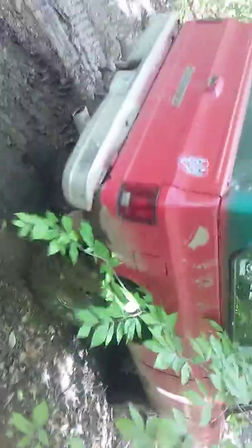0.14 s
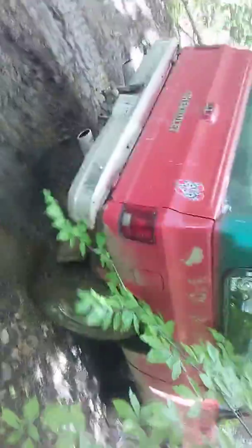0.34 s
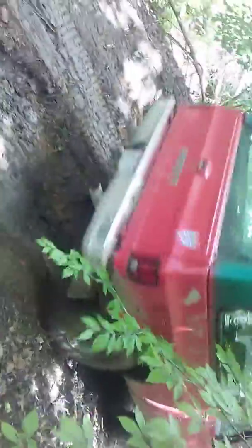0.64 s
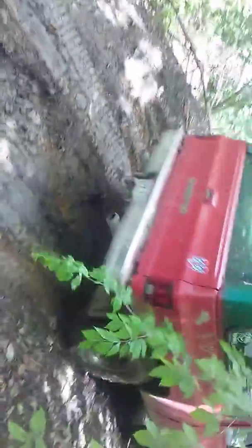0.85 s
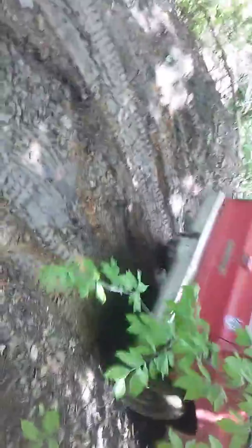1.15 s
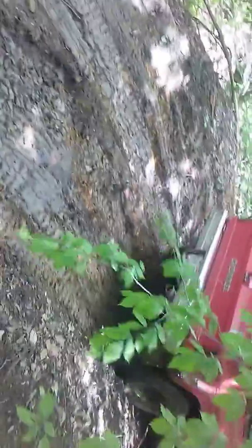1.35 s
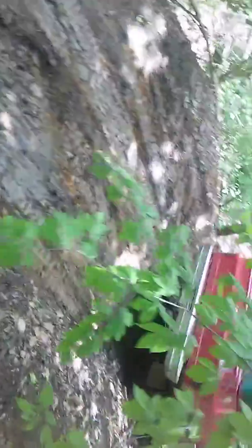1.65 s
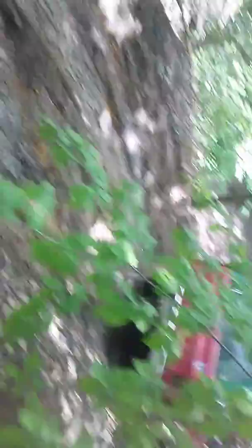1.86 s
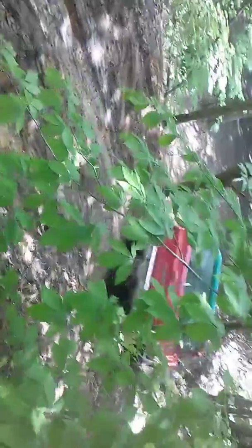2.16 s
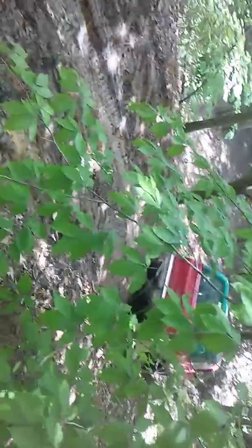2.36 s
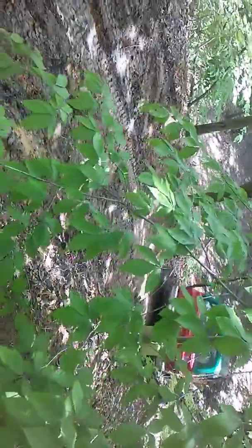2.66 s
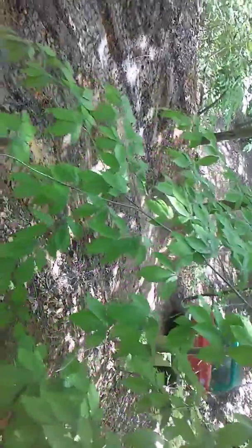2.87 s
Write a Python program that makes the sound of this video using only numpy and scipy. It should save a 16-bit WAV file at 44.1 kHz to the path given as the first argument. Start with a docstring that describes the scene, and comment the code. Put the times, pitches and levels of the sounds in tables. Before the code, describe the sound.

A pickup's uneven engine rumbles at low revs, rolling slowly off over grit and stones.

```python
"""A rough forest track, one microphone close by: a V8 pickup crawls away at little more than idle.
From the start its uneven firings lope through two tailpipes over engine clatter, grit and damp leaves.
Stones knock under the tyres, something spits once at 0.75 s, and loose metal clinks at 1.3 s.
As the truck turns, one pipe fades and the other swells; near 2 s a faint whine rises.
Softer clinks, two squeaks and a last stone follow, and at 2.8 s a squealing scrape sets in."""
import sys
import numpy as np
from scipy import signal
from scipy.fft import rfft, irfft
from scipy.io import wavfile

SR = 44100
rng = np.random.default_rng(int(sys.argv[2]) if len(sys.argv) > 2 else 0)


def persist_wave(psi):
    """Save psi, clipped to +-1, as 16-bit WAV."""
    counts = np.round(np.clip(psi, -1, 1) * 32767).astype(np.int16)
    wavfile.write(sys.argv[1], SR, np.atleast_2d(counts).T)


N = 132300
T = np.arange(N) / SR


# engine speed: t/s, firing rate/Hz
FIRING_RATE = [(0.0, 77.94), (0.2, 79.48), (0.45, 77.97), (0.8, 77.96), (1.0, 78.51), (1.4, 77.12),
               (1.8, 75.65), (2.0, 77.28), (2.25, 76.36), (2.6, 79.39), (2.8, 77.99), (3.0, 76.64)]
# one cycle, a row per cylinder: pipe (0 or 1), boom lag/ms, boom level/dB, rasp lag/ms, rasp level/dB
ENGINE_CYCLE = [(0, -1, -3.5, 0.5, -1.5), (0, 2.5, -3.5, 7.5, 0), (0, 0.64, -11, 1, -6),
                (0, -0.27, -13.5, 7, -10), (1, -2.6, 0, 4, 0), (1, -6.7, -2.5, 5, -6),
                (0, -0.6, -13, 6, -1), (0, -0.65, 1.5, 0, -5)]

def firings(lag_ms, db, chosen, jitter_s=.00012, uneven_db=.9):
    """One click per firing of the chosen cylinders, each a little off in time and strength."""
    count = np.cumsum(in_time(FIRING_RATE)[0]) / SR
    k = np.arange(int(count[-1]) + 1)
    cylinder = k % len(ENGINE_CYCLE)
    slip, strength = rng.standard_normal((len(k), 2)).T
    due_s = np.interp(k, count, T) + lag_ms[cylinder] / 1000
    at = np.maximum(due_s + jitter_s * slip, 0) * SR
    clicks = np.zeros(N + SR)
    clicks[at.astype(int)] = chosen[cylinder] * from_db(db[cylinder] + uneven_db * strength)
    return clicks[:N]


def puffs(clicks, fall_s=.0035):
    """The gas flow that follows each click."""
    return signal.lfilter([1], [1, -np.exp(-1 / (fall_s * SR))], clicks + 1e-18)


def roughen(clicks, rough):
    """Clicks plus the turbulence of their puffs."""
    return rms_one(clicks) + rough * rms_one(puffs(clicks) * rng.standard_normal(N))


# the pipes as heard from the microphone: t/s, first level/dB, second level/dB
PIPE_LEVELS = [(0, -24, -31), (0.501, -21.5, -36), (0.952, -17.5, -23), (1.4, -19.5, -20.5),
               (1.8, -22, -16.5), (2.1, -22.5, -17), (2.55, -24, -23), (3, -26.5, -25)]
# each pipe's resonance: f/Hz, width/Hz
PIPE_RESONANCES = [(220, 103), (236, 60)]

def tailpipes(pipe, lag_ms, db):
    """Each cylinder's firing booms in the resonance of its own tailpipe."""
    out = 0
    for k, ((hz, width), level) in enumerate(zip(PIPE_RESONANCES, in_time(PIPE_LEVELS))):
        gas = roughen(firings(lag_ms, db, pipe == k), rough=.2)
        out += from_db(level) * rms_one(band(gas, hz, width, order=3))
    return out


# rasp at the pipe mouths: t/s, level/dB before trim
RASP_CURVE = [(0.0, -33), (0.06, -34), (0.1, -29.5), (0.99, -20.5), (1.57, -24.5), (1.71, -30.5),
              (2.85, -34), (3.0, -45)]
# its resonances: f/Hz, width/Hz, relative level/dB
RASP_RESONANCES = [(320, 70, -10), (502, 28, 1), (639.6, 106, 4), (748, 130, -0.5), (1167, 280, -14)]

def rasp(clicks, trim_db=-4.5):
    """Turbulent puffs rasp at the pipe mouths, through resonances of alternating polarity."""
    gas = roughen(clicks, rough=.44)
    ringing = sum((-1) ** k * from_db(db) * band(gas, hz, width)
                  for k, (hz, width, db) in enumerate(RASP_RESONANCES))
    return from_db(in_time(RASP_CURVE)[0] + trim_db) * rms_one(ringing)


# valve gear and fan: t/s, level/dB before trim
CLATTER_CURVE = [(0, -32.5), (.4, -33.5), (.85, -33.5), (1.25, -33), (1.7, -35), (2.1, -34), (2.4, -32.5),
                 (3, -33.5)]
# their colour: f/Hz, relative level/dB
CLATTER_SPECTRUM = [(300, -31), (600, 6), (850, 5.5), (1100, 0.5), (1500, -3), (2000, -5), (2500, -11.5),
                    (3000, -7.5), (3450, -5.5), (4000, -8.5), (4400, -15), (5200, -30)]

def clatter(clicks, trim_db=2, pulse_depth=.053):
    """The noise of valve gear and fan pulses slightly with the firings."""
    pulsing = noise(CLATTER_SPECTRUM) * (1 + pulse_depth * rms_one(puffs(clicks)))
    return from_db(in_time(CLATTER_CURVE)[0] + trim_db) * rms_one(pulsing)


def engine():
    """The eight cylinders drive boom, rasp and clatter."""
    pipe, boom_lag, boom_db, rasp_lag, rasp_db = np.transpose(ENGINE_CYCLE)
    boom = tailpipes(pipe, boom_lag, boom_db)
    clicks = firings(rasp_lag, rasp_db, chosen=np.ones(len(pipe)))
    return boom + rasp(clicks) + clatter(clicks)


# exhaust tones: multiple of the cycle rate, level/dB before gain
HUM_ORDERS = [(6, -51.5), (7, -43), (8, -28), (9, -45.5), (10, -53.5), (11, -37.5), (18, -21.5),
              (33, -37.5), (52, -44), (63, -37.5)]
# their fade as the truck leaves: t/s, gain/dB
HUM_GAIN = [(0, 0.5), (1, 1), (1.8, -2), (2.3, -3.5), (3, -9)]

def hum(waver_db=.65):
    """The exhaust hums at multiples of the engine's cycle rate, each wavering in level."""
    angle = 2 * np.pi * np.cumsum(in_time(FIRING_RATE)[0]) / SR / len(ENGINE_CYCLE)
    orders = sum(from_db(db + waver_db * drift(3)) * np.cos(k * angle) for k, db in HUM_ORDERS)
    return from_db(in_time(HUM_GAIN)[0]) * orders


# the underbody: t/s, level/dB before trim
RUMBLE_CURVE = [(0, -29), (.17, -24), (.6, -35), (1.3, -31.5), (2, -33), (2.5, -36), (3, -37)]
# its colour: f/Hz, relative level/dB
RUMBLE_SPECTRUM = [(25, -38), (42, -24), (62, 0.5), (95, -5.5), (125, -11.5), (165, -2.5), (260, -2.5),
                   (330, 3), (400, -2.5), (470, -9), (700, -9), (1200, -49.5), (4000, -93.5)]

def rumble(trim_db=2.5):
    """Low noise from the underbody, loudest just after the start."""
    return from_db(in_time(RUMBLE_CURVE)[0] + trim_db) * noise(RUMBLE_SPECTRUM)


# stones on the track: t/s, level/dB, f/Hz
STONE_KNOCKS = [(.325, -27, 1000), (.366, -25, 1050), (.455, -26, 1550), (.607, -27, 1550),
                (.633, -17.5, 900), (.642, -26, 1500), (.70, -25, 800), (2.47, -21, 1350)]

def stones(t60_s=.07, width_hz=750):
    """Each stone knocks under the tread as a short burst of band noise."""
    return sum(from_db(db) * decay(s, t60_s) * rms_one(band(rng.standard_normal(N), hz, width_hz))
               for s, db, hz in STONE_KNOCKS)


# blows on loose metal: t/s, level/dB before mode or scatter gain
METAL_BLOWS = [(1.33, -30.5), (1.336, -23.5), (2.289, -36.5), (2.33, -40)]
# the part's modes: f/Hz, gain/dB, t60/s
METAL_MODES = [(2670, -17.5, 0.067), (3446, 5.5, 0.063), (3590, -4.5, 0.11), (4030, -9, 0.098),
               (6300, -28, .08), (7020, -15.5, .09), (7660, -24.5, 0.087), (9200, -25.5, .1),
               (10550, -24, 0.073)]
# what comes back from the trees: f/Hz, relative level/dB
TREE_SPECTRUM = [(2500, -11), (3500, 9.5), (4300, -7), (5500, -21), (7100, -3.5), (9000, -14.5),
                 (10600, -11.5), (16000, -23)]

def clinks(contact_s=.0011, width_share=.04, scatter_db=-20.5, scatter_t60_s=.39):
    """A loose metal part is struck and buzzes in its modes; the trees scatter the sound."""
    out = 0
    for hz, mode_db, t60 in METAL_MODES:
        blows = sum(from_db(db) * np.clip((T - s) / contact_s, 0, 1) * decay(s, t60)
                    for s, db in METAL_BLOWS)
        buzz = rms_one(band(rng.standard_normal(N), hz, width_share * hz))
        out += from_db(mode_db) * blows * buzz
    scatter = sum(from_db(db + scatter_db) * decay(s, scatter_t60_s) for s, db in METAL_BLOWS)
    return out + scatter * noise(TREE_SPECTRUM)


# the spit's colour: f/Hz, relative level/dB
SPIT_SPECTRUM = [(2000, -9), (3600, 10.5), (5500, -21), (6800, -4), (7700, 6.5), (9000, -4.5), (11500, -6),
                 (16000, -16)]

def spit(start_s=.754):
    """A sharp tick with a hissing tail."""
    tick = from_db(-27) * decay(start_s, t60=.031)
    tail = from_db(-36) * decay(start_s, t60=.42)
    return noise(SPIT_SPECTRUM) * (tick + tail)


# the closing squeal: t/s, f/Hz, level/dB
SQUEAL_CURVE = [(2.77, 2708, -67), (2.81, 2793, -36), (2.86, 3093, -30.5), (2.92, 2945, -32),
                (3, 3300, -35)]
# the hiss around it: f/Hz, relative level/dB
SCRAPE_SPECTRUM = [(1500, -1.5), (2800, 8), (4000, -18), (5200, -22.5), (6300, -10), (8000, -9),
                   (10000, -18.5), (12500, -28), (16000, -37.5)]

def scrape(spread_hz=170, hiss_db=-4.5):
    """A rough squeal, narrow noise around a rising pitch, wrapped in hiss."""
    hz, db = in_time(SQUEAL_CURVE)
    angle = 2 * np.pi * np.cumsum(hz) / SR
    squeal = rms_one(drift(spread_hz) * np.sin(angle) + drift(spread_hz) * np.cos(angle))
    hiss = from_db(hiss_db) * noise(SCRAPE_SPECTRUM)
    return from_db(db) * (T > SQUEAL_CURVE[0][0]) * (squeal + hiss)


# squeaks ahead of the scrape: t/s, f/Hz, peak level/dB
SHORT_SQUEAKS = [(2.294, 3430, -31), (2.626, 3980, -26)]

def squeaks(half_length_s=.011):
    """Brief high tones with an unsteady pitch."""
    out = 0
    for s, hz, db in SHORT_SQUEAKS:
        swell = np.exp(-((T - s) / half_length_s) ** 2)
        angle = 2 * np.pi * np.cumsum(hz * (1 + .0052 * drift(420))) / SR
        out += from_db(db) * swell * np.sin(angle)
    return out


# the whine's fundamental: t/s, f/Hz, level/dB
WHINE_CURVE = [(1.9, 386, -52), (2.0, 397, -33), (2.2, 415, -33), (2.33, 432, -36), (2.42, 436, -56)]

def whine(octave_db=-6):
    """A faint rising tone and its octave."""
    hz, db = in_time(WHINE_CURVE)
    angle = 2 * np.pi * np.cumsum(hz * (1 + .0044 * drift(25))) / SR
    sounding = (T > WHINE_CURVE[0][0]) * (T < WHINE_CURVE[-1][0])
    return from_db(db) * sounding * (np.sin(angle) + from_db(octave_db) * np.sin(2 * angle))


# grit on the track: t/s, level/dB
GRIT_CURVE = [(0, -48), (.4, -41.5), (.85, -36), (1.3, -51), (1.7, -41.5), (2.1, -40), (2.4, -40), (3, -43)]

def grit(grains_per_s=300, spread_db=2.8, width_hz=170):
    """Grit crunches under the tread; each grain rings briefly at one of 14 pitches."""
    sizes = from_db(spread_db * np.minimum(rng.exponential(1, N), 3)) * rng.choice([-1, 1], N)
    grains = sizes * (rng.random(N) < grains_per_s / SR)
    pitches_hz = np.geomspace(893, 3300, 14)
    dealt = rng.integers(0, len(pitches_hz), N)
    crunch = sum(band(grains * (dealt == k), hz, width_hz) / np.sqrt(hz)
                 for k, hz in enumerate(pitches_hz))
    return from_db(in_time(GRIT_CURVE)[0]) * rms_one(crunch)


# damp leaves on the ground: t/s, level/dB
LEAF_CURVE = [(0, -59), (.3, -56), (.5, -58), (1, -56), (1.25, -63), (1.65, -62), (2.1, -67.5),
              (2.33, -61.5), (2.55, -69.5), (2.78, -70.5)]
# their colour: f/Hz, relative level/dB
LEAF_SPECTRUM = [(4000, -23), (5400, -16), (6800, -0.5), (7600, 2.5), (9000, -4), (11000, -7), (12500, -12),
                 (16000, -20.5)]

def leaves():
    """The tyres roll through damp leaves with a faint, flickering hiss."""
    return from_db(in_time(LEAF_CURVE)[0] + drift(30)) * noise(LEAF_SPECTRUM)


def from_db(db):
    """Decibels to gain."""
    return 10 ** (np.asarray(db) / 20)


def rms_one(x):
    """Scale to unit rms."""
    return x / np.sqrt(np.mean(x ** 2) + 1e-20)


def in_time(rows):
    """The columns of a curve at every sample."""
    s, *columns = np.transpose(rows)
    return [np.interp(T, s, c) for c in columns]


def noise(spectrum):
    """Noise of a given colour, rms 1."""
    hz, db = np.transpose(spectrum)
    f = np.maximum(np.arange(N // 2 + 1) * SR / N, 1)
    gain = from_db(np.interp(np.log(f), np.log(hz), db)) * np.minimum(f / hz[0], 1) ** 2
    return rms_one(irfft(rfft(rng.standard_normal(N)) * gain, N))


def band(x, hz, width_hz, order=2):
    """Band-pass around a centre."""
    low = np.sqrt(hz ** 2 + width_hz ** 2 / 4) - width_hz / 2
    sos = signal.butter(order, [low, low + width_hz], "band", fs=SR, output="sos")
    return signal.sosfilt(sos, x + 1e-18)


def drift(hz):
    """Random motion slower than about hz, rms 1."""
    sos = signal.butter(2, hz, fs=SR, output="sos")
    return rms_one(signal.sosfilt(sos, rng.standard_normal(2 * N))[N:])


def decay(start, t60):
    """Sudden start, exponential fall."""
    return (T >= start) * from_db(-60 * np.maximum(T - start, 0) / t60)


def dull(x, edge_hz=4272):
    """Steep loss of the treble."""
    return signal.sosfilt(signal.ellip(8, .5, 75, edge_hz, fs=SR, output="sos"), x)


def scene():
    """The truck and all that it stirs, heard from the track in mono."""
    dark = dull(engine() + grit() + hum() + rumble() + stones())
    return (dark + whine() + leaves() + clinks() + spit() + squeaks() + scrape())[None]


def record(dry, notch_hz=4474, width_hz=1100, depth_db=-14.5, cutoff_hz=15750):
    """The microphone is weak in one treble band; the top is cut."""
    f = np.arange(N + 1) * SR / (2 * N)
    response = from_db(depth_db * np.exp(-(2 * (f - notch_hz) / width_hz) ** 4))
    notched = irfft(rfft(dry, 2 * N) * response)[:, :N]
    return signal.sosfilt(signal.ellip(10, .1, 80, cutoff_hz, fs=SR, output="sos"), notched)


dry = scene()
out = record(dry)
persist_wave(out)
```